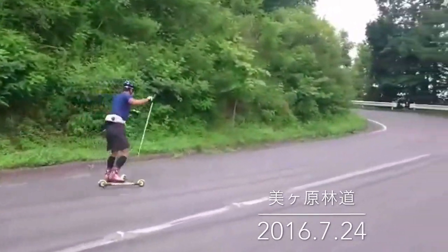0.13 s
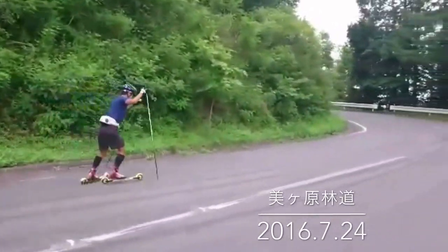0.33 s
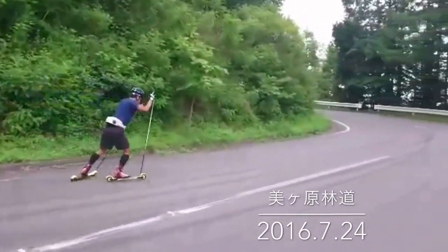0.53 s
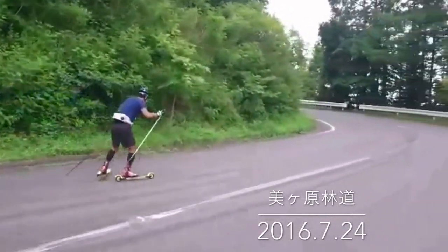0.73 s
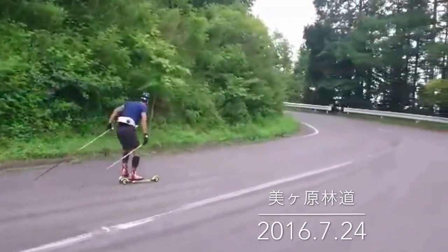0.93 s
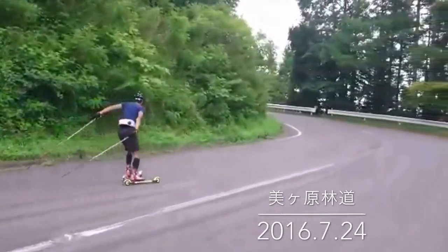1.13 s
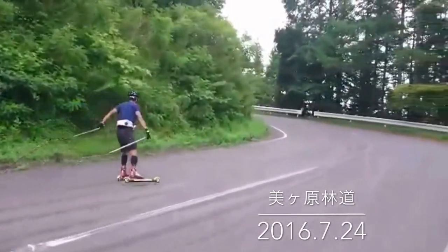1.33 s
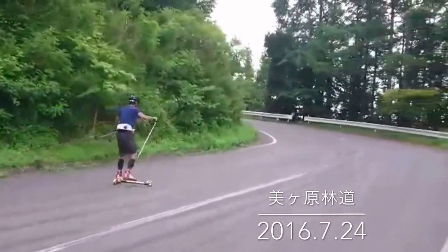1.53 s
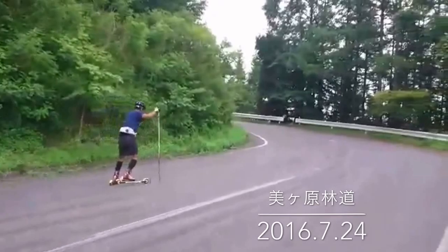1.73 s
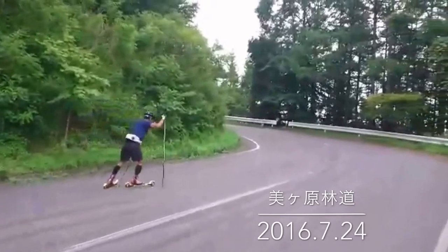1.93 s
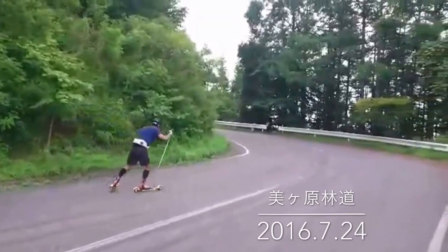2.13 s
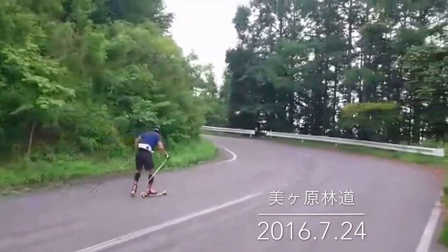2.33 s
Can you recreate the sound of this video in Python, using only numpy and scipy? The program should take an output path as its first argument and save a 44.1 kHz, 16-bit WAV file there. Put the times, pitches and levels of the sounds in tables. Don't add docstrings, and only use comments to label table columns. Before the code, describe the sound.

Roller skis scrape and pole tips clack on tarmac, with faint wheel hiss on a forest road

```python
import sys
import numpy as np
from scipy import signal
from scipy.fft import rfft, irfft
from scipy.io import wavfile
from scipy.ndimage import uniform_filter1d

SR = 44100
rng = np.random.default_rng(int(sys.argv[2]) if len(sys.argv) > 2 else 0)


def natural_amplitude(level_db):
    exponent = np.asarray(level_db, float) / 20
    return 10 ** exponent


def dump_mix(stems):
    frames = np.atleast_2d(stems).T
    limited = np.clip(frames, -1, 1)
    pcm = np.round(limited * 32767).astype(np.int16)
    wavfile.write(sys.argv[1], SR, pcm)


N = 110250
T = np.arange(N) / SR
HZ = np.fft.rfftfreq(N, 1 / SR)
AHEAD = T < .4

# (time [s], pressure [dB], share of pole tip against ski [0-1], sand spray [dB])
SCUFF = [
    (.2015, -50, .3, -58),
    (.205, -41, .35, -56),
    (.213, -43, .2, -55),
    (.218, -37, .2, -53),
    (.236, -35, .1, -53),
    (.255, -29.5, .1, -51),
    (.27, -32, .1, -51),
    (.2745, -46, .2, -60),
    (.284, -58, .3, -70),
]
PLANT = [
    (.524, -67, .1, -87),
    (0.532, -56, 0.11, -89),
    (.549, -50.5, 0.092, -85),
    (.553, -64, .2, -93),
    (0.563, -64, 0.27, -83),
    (0.565, -49, 0.54, -68),
    (0.571, -46, 0.41, -60),
    (.585, -52, 1, -62),
    (0.599, -59, 0.8, -66),
]
KICK = [
    (0.599, -54, 0.36, -61),
    (.606, -44, .1, -56.5),
    (.63, -45.5, 0.036, -54.5),
    (0.649, -43, 0.042, -57),
    (.66, -50, 0.055, -61.5),
    (0.677, -48, 0.05, -57.5),
    (.69, -51.5, 0.075, -62.5),
    (0.721, -72.5, 0.046, -72),
]
DRAG = [
    (0.726, -63.5, 0.2, -66.5),
    (0.763, -61, 0.27, -63.5),
    (0.849, -75.5, 1, -78.5),
]
SKID = [
    (0.964, -59, 0.45, -89),
    (.974, -57, 0.72, -82),
    (.985, -57.5, 0.55, -71),
    (.992, -44, 1, -60),
    (1.012, -52.5, 0.99, -59),
    (1.03, -43, 0.78, -59),
    (1.043, -46, 0.87, -59),
    (1.066, -43.5, 0.95, -60),
    (1.1, -51.5, 0.89, -59),
]
PUSH = [
    (1.1, -52.5, 0.49, -56),
    (1.144, -49, 0.076, -55),
    (1.155, -38.5, 0.018, -54.5),
    (1.163, -47, .05, -56),
    (1.194, -49.5, 0.15, -55),
    (1.204, -59.5, 0.14, -64.5),
    (1.235, -59, 0.071, -76),
    (1.265, -63.5, 0.088, -71),
    (1.289, -82, 0.18, -95),
]
STEP = [
    (1.694, -72, .2, -67),
    (1.712, -72, .15, -73),
    (1.718, -66, .1, -73),
    (1.736, -65, .2, -66),
    (1.75, -78, .3, -84),
]
STAB = [
    (2.0, -69.5, 0.23, -81),
    (2.045, -65.5, 0.21, -81),
    (2.05, -56, .95, -52),
    (2.063, -56, 1, -67),
    (2.073, -50, 1, -52),
    (2.085, -56, 0.81, -60),
    (2.09, -66, 1, -54),
    (2.105, -62, 1, -66.5),
    (2.261, -76, 0.91, -95),
]


def friction():
    ski, tip, sand = np.zeros((3, N))
    for episode in (SCUFF, PLANT, KICK, DRAG, SKID, PUSH, STEP, STAB):
        s, db, share, sand_db = np.transpose(episode)
        inside = np.clip(np.minimum(T - s[0], s[-1] - T) / .001 + .5, 0, 1)
        pressure = inside * natural_amplitude(np.interp(T, s, db) + 7.5)
        tip_share = np.interp(T, s, share)
        ski += pressure * np.sqrt(1 - tip_share)
        tip += pressure * np.sqrt(tip_share)
        sand += inside * natural_amplitude(np.interp(T, s, sand_db) + 10.5)
    return ski, tip, sand


# (time [s], peak [dB], share of tip ring against shaft knock [0-1])
STRIKES = [(.479, -47.5, 0.5), (0.51, -45, 0.1), (0.5294, -36, 0), (0.5317, -33, 0.03), (0.548, -36.5, 0),
           (0.5689, -26.5, 0.3), (.605, -35.5, 0.14), (0.618, -39, .3), (0.644, -51, 0.05),
           (0.678, -57, 0.9), (.687, -53, 0), (0.743, -46, 0.8), (.971, -35.5, 1), (0.975, -41, 0.4),
           (0.9878, -31.5, 0.7), (0.9939, -29.5, 1), (1.003, -33, 0.8), (1.017, -49, 0.3),
           (1.0265, -35, 0.8), (1.0329, -28.5, 0.4), (1.0356, -36, 1), (1.039, -29.5, 0.5),
           (1.049, -29, 0.1), (1.062, -36.5, 0.1), (1.065, -34.5, 0.9), (1.071, -40, 0.9), (1.115, -44, 0),
           (1.134, -44, 0.4), (1.152, -57, .05), (1.165, -43, .5), (1.254, -45, 0), (1.26, -37.5, 0),
           (1.272, -45.5, 0.5), (1.6977, -51, 0.7), (1.734, -48.5, 0.5), (1.7755, -55, .7),
           (2.01, -48, 0.6), (2.039, -45, 0.2), (2.05, -33, 0.66), (2.0535, -48, 1), (2.0663, -29, 0.7),
           (2.0692, -37, 1), (2.076, -44, 1), (2.087, -45.5, 1), (2.09, -33, 0.7)]


def strikes():
    s, db, share = np.transpose(STRIKES)
    hits = np.zeros((2, N))
    hits[:, np.round(s * SR).astype(int)] = natural_amplitude(db + 5) * np.sqrt([1 - share, share])
    outline = decay(rise_s=.0002, fall_s=.001)
    return signal.oaconvolve(hits, outline[None], axes=1)[:, :N]


# (frequency [Hz], level [dB])
FRAME_COLOUR = [(150, -30), (380, -11), (750, -9), (1900, -2), (3300, -5), (4600, -9), (6200, -14),
                (12000, -27)]
SKI_COLOUR = [(150, -33.5), (400, -9), (1400, -1.5), (2200, -2), (3400, -7.5), (4700, -17.5), (6300, -18),
              (12000, -37.5)]
# (frequency [Hz], width [Hz], level [dB])
SKI_RINGS = [(2200, 450, 2), (3400, 700, 0), (6300, 900, 3)]


def ski_scrape(ski, rough):
    drive = ski * rough * clatter()
    return body(drive * AHEAD, FRAME_COLOUR, SKI_RINGS) + body(drive * ~AHEAD, SKI_COLOUR, SKI_RINGS)


# (frequency [Hz], level [dB])
TIP_COLOUR = [(600, -42.5), (1000, -7), (1800, -0.5), (2400, 4.5), (4200, 2.5), (5500, 0.5), (7000, 0.5),
              (8500, -23)]
# (frequency [Hz], width [Hz], level [dB])
TIP_RINGS = [(5400, 400, 5), (6450, 450, 0), (2350, 350, -2), (3500, 400, 1)]


def pole_tip(tip, hits, rough):
    return body((tip * np.sqrt(rough) + hits) * clatter(), TIP_COLOUR, TIP_RINGS)


# (frequency [Hz], level [dB])
SHAFT_COLOUR = [(800, -94), (1700, -1), (2300, 6.5), (4000, -1.5), (7000, -28), (15000, -41)]
# (frequency [Hz], width [Hz], level [dB])
SHAFT_RINGS = [(2200, 370, -6.5), (3930, 620, -10)]


def shaft_knock(hits):
    return body(hits * clatter(), SHAFT_COLOUR, SHAFT_RINGS)


# (time [s], peak [dB], frequency [Hz])
SHAFT_MODES = [(.531, -37, 2240), (.533, -39, 4050), (.5685, -31, 2350), (.57, -31, 3700),
               (.617, -37, 2170), (.971, -37, 5530), (.9943, -27, 6410), (1.033, -27, 5290),
               (1.039, -28, 3500), (1.062, -33, 2500), (1.072, -32, 5400), (1.152, -40, 2090),
               (1.2553, -39, 2130), (1.258, -42, 3600), (1.732, -56, 3650), (2.049, -38, 6980),
               (2.0662, -30, 3300), (2.0662, -34, 5470)]


def shaft_modes():
    return sum(ring(*mode) for mode in SHAFT_MODES)


# (frequency [Hz], level [dB])
SAND_COLOUR = [(1000, -22), (4700, -3.5), (7000, -1.5), (12000, -9), (15000, -9.5)]


def sand_spray(sand, tip_hits, rough):
    return body((sand * np.sqrt(rough) + natural_amplitude(-16) * tip_hits) * clatter(), SAND_COLOUR)


# (time [s], peak [dB])
THUMPS = [
    (0.533, -61),
    (0.572, -62.5),
    (0.679, -64),
    (1.251, -61),
]


def wheel_thumps():
    return sum(natural_amplitude(db + 11) * blip(s, width_s=0.005, hz=250) for s, db in THUMPS)


# (time [s], level [dB], half length [s])
KNOCKS = [
    (.548, -61, 0.007),
    (.57, -48.5, 0.0067),
    (0.657, -53, 0.017),
    (1.154, -50, 0.0076),
    (1.248, -56.5, 0.018),
    (1.724, -62.5, 0.012),
    (2.051, -63, 0.0075),
    (2.064, -64.5, 0.041),
]
# (frequency [Hz], level [dB])
KNOCK_COLOUR = [(120, -27), (250, -5), (500, -3), (900, -3.5), (1600, -19)]


def load_knocks():
    load = sum(natural_amplitude(db) * np.exp(-((T - s) / half_s) ** 2) for s, db, half_s in KNOCKS)
    return body(load * clatter(), KNOCK_COLOUR)


def contacts():
    ski, tip, sand = friction()
    shaft_hits, tip_hits = strikes()
    slips = grit(per_s=900, spread_db=3, fall_s=.0007)
    rough = evened(natural_amplitude(-1) + slips)
    low = ski_scrape(ski, rough) + sand_spray(sand, tip_hits, rough)
    low = low + shaft_modes() + wheel_thumps() + load_knocks()
    return low, pole_tip(tip, tip_hits, rough) + shaft_knock(shaft_hits)


# (time [s], level [dB])
ROLLING = [(0, -65), (.2, -66.5), (.5, -64), (.9, -67), (1.3, -64), (1.55, -72), (1.85, -66.5),
           (2.15, -73.5), (2.3, -67.5), (2.5, -73.5)]
# (frequency [Hz], level [dB])
ROLL_COLOUR = [(120, -20), (300, -8.5), (1500, -7), (4300, -8.5), (6300, -3.5), (8000, -6.5),
               (11500, -16.5), (15000, -23.5)]
# (frequency [Hz], width [Hz], level [dB])
ROLL_RINGS = [(2310, 2700, 7.5), (3660, 670, 0)]
# (time [s], level [dB])
BEARING = [(1.3, -93), (1.62, -72), (2.1, -73), (2.5, -90)]
# (frequency [Hz], level [dB])
BEARING_COLOUR = [(2600, -41), (3600, -9), (4800, -34)]


def rolling():
    hiss = body(rng.standard_normal((2, N)), ROLL_COLOUR, ROLL_RINGS)
    z = signal.stft(hiss, nperseg=512)[2]
    patches = rng.standard_normal(z.shape[1:])
    patches = uniform_filter1d(patches, 7, 0)
    patches = evened(uniform_filter1d(patches, 9, 1))
    hiss = signal.istft(z * natural_amplitude(1.3 * patches), nperseg=512)[1][:, :N]
    hiss = evened(hiss) * natural_amplitude(np.interp(T, *np.transpose(ROLLING)) + 4)
    sing = body(rng.standard_normal((2, N)), BEARING_COLOUR)
    return hiss + sing * natural_amplitude(np.interp(T, *np.transpose(BEARING)))


# (frequency [Hz], 60 dB decay time [s])
TREES_T60 = [(300, 0.56), (3000, 0.4), (14000, 0.82)]


def trees(x):
    level_db, delay_s = -19.5, 0.0081
    hz, t, z = signal.stft(rng.standard_normal((2, SR)), SR, nperseg=256)
    fade = natural_amplitude(-60 * t / read(TREES_T60, hz)[:, None])
    tail = signal.istft(z * fade, SR, nperseg=256)[1]
    tail = tail * (np.arange(tail.shape[1]) / SR > delay_s)
    tail = tail / np.linalg.norm(tail[0])
    return natural_amplitude(level_db) * signal.fftconvolve(x, tail, axes=1)[:, :N]


# (time [s], level [dB])
GUST = [(0, -61), (.4, -70.5), (.7, -75.5), (1.7, -77.5), (2.0, -74), (2.5, -77)]
# (frequency [Hz], level [dB])
WIND_COLOUR = [(20, -6.5), (35, -10.5), (65, -0.5), (110, -4), (160, -7), (500, -36)]
# (time [s], peak [dB], frequency [Hz])
PUFFS = [
    (.047, -48.5, 112),
    (0.071, -41, 73.6),
    (0.099, -39.5, 90.5),
    (0.158, -44, 102),
    (0.207, -47, 82),
    (0.36, -56, 110),
    (1.007, -60.5, 79),
    (1.262, -59.5, 114),
    (1.985, -60.5, 61),
]


def wind():
    spectrum = rfft(rng.standard_normal((2, N))) * natural_amplitude(read(WIND_COLOUR, HZ))
    lumps = natural_amplitude(3 * np.array([wander(24.7), wander(23.0)]))
    buffeting = evened(irfft(spectrum, N) * lumps) * natural_amplitude(np.interp(T, *np.transpose(GUST)))
    puffs = sum(natural_amplitude(db) * blip(s, width_s=0.0084, hz=hz) for s, db, hz in PUFFS)
    return buffeting + puffs * np.array([[1], [0]])


# (frequency [Hz], coherence [0-1])
LIKENESS = [(200, .98), (1400, .87), (2800, .91), (4500, .8), (7000, .62), (10000, .45)]
# (frequency [Hz], left minus right [dB])
TILT = [(300, -6), (1500, -5), (2300, 1), (3200, -5), (5000, -1), (6200, -6), (7600, -4), (10000, 0)]


def ports(x, lag_s, focus=1):
    shared, separate = rfft(x)
    like = focus * read(LIKENESS, HZ)
    tilt = natural_amplitude(read(TILT, HZ) / 2)
    phase = 3.3 + 2 * np.pi * HZ * lag_s
    right = like * shared * np.exp(-1j * phase) + np.sqrt(1 - like ** 2) * separate
    return irfft(np.array([shared * tilt, right / tilt]), N)


def clatter():
    return rng.choice([-1., 1.], (2, N))


def grit(per_s, spread_db, fall_s):
    size = natural_amplitude(spread_db * np.minimum(rng.exponential(1, N), 3.0))
    catches = size * (rng.random(N) < per_s / SR)
    return evened(signal.oaconvolve(catches, decay(0.00062, fall_s))[:N])


def decay(rise_s, fall_s):
    t = np.arange(900) / SR
    return (1 - np.exp(-t / rise_s)) * np.exp(-t / fall_s)


def blip(s, width_s, hz):
    return np.exp(-((T - s) / width_s) ** 2) * np.cos(2 * np.pi * hz * (T - s))


def ring(s, db, hz):
    t = np.maximum(T - s, 0)
    return (1 - np.exp(-t / .0003)) * natural_amplitude(db - 60 * t / .017) * np.sin(2 * np.pi * hz * t)


def body(x, colour, rings=()):
    hz = np.fft.rfftfreq(4096, 1 / SR)
    humps = sum(natural_amplitude(db) / (1 + (2 * (hz - f) / width) ** 2) for f, width, db in rings)
    gain = natural_amplitude(read(colour, hz)) * (1 + humps)
    log_gain = np.log(np.concatenate([gain, gain[-2:0:-1]]) + 1e-5)
    taps = np.fft.ifft(np.exp(np.conj(signal.hilbert(log_gain)))).real[:2048]
    return signal.oaconvolve(x, taps[None] / np.linalg.norm(taps), axes=1)[:, :N]


def wander(per_s):
    rates = np.geomspace(per_s / 8, per_s, 24)
    return evened(sum(np.sin(2 * np.pi * (f * T + rng.random())) / np.sqrt(f) for f in rates))


def read(points, hz):
    f, value = np.transpose(points)
    return np.interp(np.log(hz + 1), np.log(f + 1), value)


def evened(x):
    return x / np.sqrt(np.mean(x ** 2) + 1e-20)


def scene():
    ski, tip = contacts()
    ahead_lag_s, ski_lag_s, tip_lag_s = 2e-5, 3.5e-5, 6.5e-5
    near = ports((ski + tip) * AHEAD, ahead_lag_s)
    near = near + ports(ski * ~AHEAD, ski_lag_s) + ports(tip * ~AHEAD, tip_lag_s)
    diffuse = ports(trees(ski + tip) + rolling(), ski_lag_s, focus=.5)
    return near + diffuse + wind()


def band_limit(x):
    return signal.sosfilt(signal.butter(12, 16410, fs=SR, output="sos"), x)


def record(dry):
    low_pass = signal.firwin(255, 15500, window=("kaiser", 8), fs=SR)
    mix = signal.oaconvolve(dry, low_pass[None], "same")
    return band_limit(mix)


dry = scene()
out = record(dry)
dump_mix(out)
```